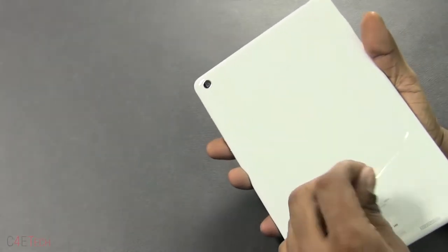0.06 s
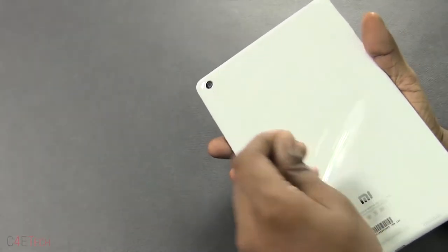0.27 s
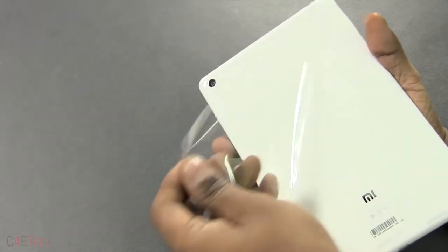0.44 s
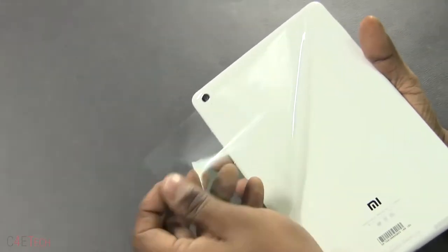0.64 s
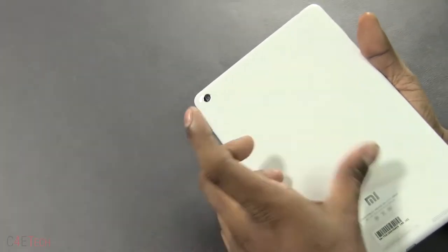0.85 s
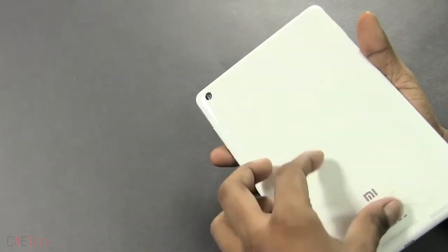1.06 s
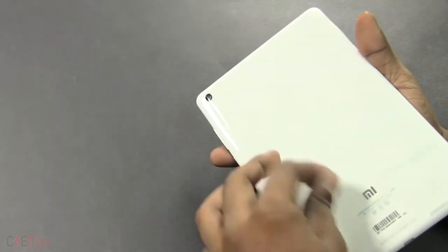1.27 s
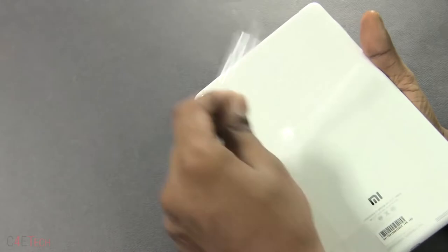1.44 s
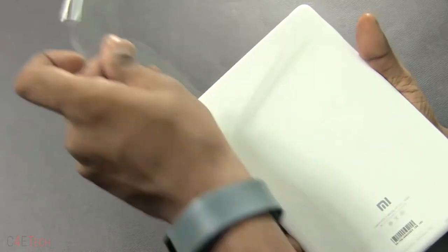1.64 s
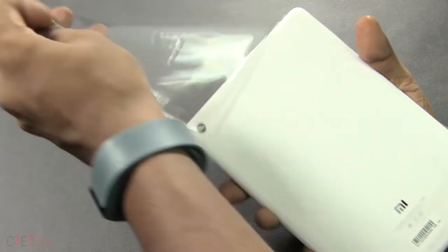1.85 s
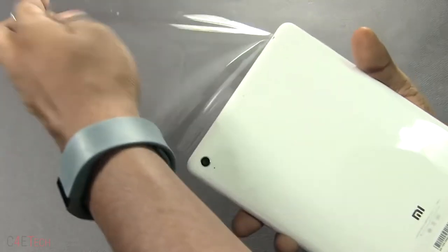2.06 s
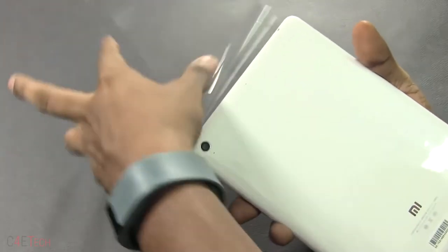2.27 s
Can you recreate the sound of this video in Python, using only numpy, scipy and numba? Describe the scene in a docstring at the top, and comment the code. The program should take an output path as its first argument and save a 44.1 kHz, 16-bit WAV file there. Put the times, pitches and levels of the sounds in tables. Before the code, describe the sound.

Crackly ripping of clear protective film from a hard case, two pulls with a sharp slap between

```python
"""Protective film is peeled off the back of a tablet in two pulls, close to the microphone in a bare room.
The glue parts by stick-slip: rapid slips, with fine crackle between them, ring three resonances of the taut sheet.
Lone snaps ring the same sheet, knocks ring the case, and creases in the loose film rustle as coloured clicks.
The released film slaps once, as a swing of air pressure. Decaying noise makes the echoes of the room, and slowly
decaying sine modes make a faint ring of metal; steady coloured noise lies beneath."""
import sys
import numpy as np
from scipy import signal
from scipy.fft import rfft, irfft
from scipy.io import wavfile
from scipy.ndimage import uniform_filter1d
from numba import njit

SR = 44100
rng = np.random.default_rng(int(sys.argv[2]) if len(sys.argv) > 2 else 0)


def log_audio(samples):
    """Write samples as a 16-bit WAV file to the path given in sys.argv[1]."""
    # one column per channel
    frames = np.atleast_2d(samples).T
    # limit to full scale, then quantise
    limited = np.clip(frames, -1, 1)
    pcm = np.round(limited * 32767).astype(np.int16)
    wavfile.write(sys.argv[1], SR, pcm)


N = 101429  # length in samples

# Steady background noise. Each row: frequency in Hz, relative level in dB.
FLOOR_COLOUR = [(30, -26.5), (130, 0.5), (550, 3.5), (1000, -7.5), (16000, -34)]
# Decay of the room. Each row: frequency in Hz, time to fall by 60 dB in seconds.
ROOM_T60 = [(150, .3), (600, 0.61), (2000, 0.5339), (4000, 0.72), (8000, 0.3537), (14000, 0.63)]
# Modes of the ringing metal. Each row: frequency in Hz, relative level in dB, time to fall by 60 dB in seconds.
METAL_MODES = [(2150, -6, 1), (3793, -7, 2.1), (3899, 0, 2.5), (3925, 2, .9)]
# Loose film rustling between the fingers. Each row: time in seconds, level in dB.
RUSTLE_LEVEL = [(0, -33.5), (.045, -44), (.1, -37), (.8, -41), (.93, -59.5), (1.06, -68.5), (1.11, -49),
                (1.2, -71.5), (1.34, -55), (1.39, -33), (2.06, -45), (2.19, -50.5), (2.3, -35.5)]
# Spectrum of the rustle. Each row: frequency in Hz, relative level in dB.
RUSTLE_COLOUR = [(100, -34.5), (500, -24.5), (950, 0.5), (1500, -4), (8000, -6), (16000, -15.5)]
# Resonances of the case. Each row: frequency in Hz, width in Hz, level in dB.
CASE_MODES = [(1040, 230, -3), (1820, 580, -3), (2746, 330, -14), (6300, 3800, -12.5)]
# Knocks on the case. Each row: time in seconds, level in dB.
KNOCKS = [(.0552, -5.5), (.7458, 4), (1.1264, -11), (2.149, -11), (2.213, -11.5), (2.2945, -6)]
# Single snaps of the film as a pull starts, as it breaks into jerks and as it is handled.
# Each row: time in seconds, crisp level in dB, flap level in dB.
SNAPS = [(.055, 2, -37.5), (.114, 2, -22), (.119, -0.5, -19), (.7458, -0.5, -12), (1.3525, -12.5, -50),
         (1.3715, -10.5, -13), (1.3795, -6, -36), (1.797, 5, -3), (1.8116, 7, -0.5), (1.8318, 0.5, -0.5),
         (1.842, 8.5, -8), (1.8468, -2, 1.5), (1.8712, 9, -3), (1.8844, 8.5, 0.5), (1.8936, 10, 0.5),
         (1.9092, -8, -6), (1.9136, 0.5, 2.5), (1.9214, 7.5, 0), (1.9503, -1, 4), (1.9603, 4, -8),
         (1.9681, 4, -2), (1.9821, 4.5, 4), (1.9918, 0, 0.5), (2.004, 4, 0.5), (2.2038, -16.5, -30),
         (2.254, -15, -35)]
# The sheet's resonances, which move with its tension and free length.
# Each row: time in seconds, crisp frequency in Hz, body frequency in Hz, flap frequency in Hz.
SHEET_HZ = [(.12, 7500, 2600, 1213), (.46, 8300, 2070, 760), (1.37, 6610, 2600, 1156),
            (1.5, 6400, 2330, 960), (1.6, 6870, 2300, 790), (1.7, 7940, 2940, 754), (1.95, 6800, 2920, 864)]
# The two pulls. Each row: time in seconds, slips per second, crisp, body and flap levels in dB.
FIRST_PULL = [(.122, 197.6, -23, -27, -39), (.16, 230, -17.5, -26, -30.5), (.2, 145, -24, -30, -39),
              (.255, 176, -22.5, -31.5, -36), (.34, 188, -20.5, -26, -32), (.39, 252, -18.5, -22.5, -29.5),
              (.464, 378, -16, -20, -24.5), (.51, 224, -20.5, -23, -28.5), (.57, 279, -17.5, -22.5, -25),
              (.615, 172, -39, -32.5, -42)]
SECOND_PULL = [(1.375, 500, -41, -45, -46), (1.405, 599, -29.5, -34.5, -33.5),
               (1.446, 503.4, -28.5, -29, -31), (1.453, 277.2, -19.5, -29, -30),
               (1.53, 261.3, -19, -27.5, -34), (1.59, 259.3, -20.5, -22.5, -31.5),
               (1.65, 231, -21.5, -23.5, -31.5), (1.76, 240.3, -20.5, -19, -32),
               (1.81, 299.5, -25.5, -23.5, -35.5), (1.925, 299.6, -24, -31, -30.5),
               (1.948, 298.4, -31, -53, -31.5), (2.045, 200.6, -49, -37, -38.5)]
# Response of the microphone. Each row: frequency in Hz, gain in dB.
MIC_RESPONSE = [(30, -36), (160, 4), (400, -1), (1400, -4.5), (1950, 0), (5000, -1), (9000, -1),
                (10800, -2), (16000, -3)]

FLOOR_DB, METAL_DB, TAIL_DB = -70.5, -60.5, -3.5
DESK_DB, DESK_DECAY_S = -2.5, 0.0027
WALL_DB, WALL_DELAY_S, WALL_DECAY_S = -2, .008, 0.0061
CASE_LOW_HZ = 750  # knocks are thinned below this
SLAP_S, SLAP_HZ, SLAP_DB = .746, 1265, -0.5
CRISP_WIDTH_HZ, BODY_WIDTH_HZ, FLAP_WIDTH_HZ = 3500, 1350, 555
BEND_MS = 0.593  # travel time of a 1 kHz bending wave across the film
SNAP_BODY_DB = -3.5
SLIP_JITTER, SLIP_SCATTER_DB, TIMBRE_SCATTER_DB = .38, 1, 1.5
CRACKLE_PER_S, CRACKLE_JITTER, CRACKLE_DB, CRACKLE_SCATTER_DB = 2200, 0.95, -9, 4
HUSH_DB, HUSH_FROM_HZ, HUSH_DEPTH_DB = -68, 650, -11
CEILING = .88  # amplitude that the rounded peaks approach
TOP_HZ = 15900


def undb(db):
    """Amplitude ratio: twenty decibels are a factor of ten."""
    return 10 ** (np.asarray(db) / 20)


def unit(x):
    """Normalisation to a root-mean-square of 1."""
    return x / np.sqrt(np.mean(x ** 2))


def curve(table, axis):
    """Linear interpolation of one column of a table over time."""
    rows = np.array(table)
    return np.interp(np.arange(N) / SR, rows[:, 0], rows[:, axis])


def at_pitch(points, hz):
    """Interpolation of (Hz, value) points on a logarithmic frequency axis."""
    rows = np.array(points)
    return np.interp(np.log(np.maximum(hz, 1)), np.log(rows[:, 0]), rows[:, 1])


def colour(x, points, size=4096):
    """Minimum-phase filtering: folding the cepstrum makes a (Hz, dB) response causal."""
    hz = np.arange(size // 2 + 1) * SR / size
    cepstrum = irfft(np.log(undb(at_pitch(points, hz))))
    cepstrum[1:size // 2] *= 2
    cepstrum[size // 2 + 1:] = 0
    impulse_response = irfft(np.exp(rfft(cepstrum)))
    return signal.fftconvolve(x, impulse_response)[:len(x)]


@njit
def moving_bandpass(x, g, k):
    """State-variable band-pass: two integrators in a loop, with tuning g and damping k at each sample."""
    y, band, low = np.empty(len(x)), 0., 0.
    for i in range(len(x)):
        v = (band + g[i] * (x[i] + 1e-18 - low)) / (1 + g[i] * (g[i] + k[i]))
        band = 2 * v - band
        low = low + 2 * g[i] * v
        y[i] = k[i] * v
    return y


def resonance(x, hz, width_hz):
    """Damped resonance, scaled so that a click keeps its energy."""
    g = np.tan(np.pi * hz / SR) * np.ones(N)
    k = width_hz / hz * np.ones(N)
    return moving_bandpass(x, g, k) * np.sqrt((1 + g * (g + k)) / (g * k))


def clicks(rate, jitter, scatter_db, count=7000):
    """Point process: log-normal gaps at a moving rate per second, with rms near 1."""
    gap, size = rng.standard_normal((count, 2)).T
    due = np.cumsum(np.exp(jitter * gap - jitter ** 2 / 2))
    elapsed = np.cumsum(rate * np.ones(N)) / SR  # clicks expected so far
    at = np.searchsorted(elapsed, due)
    heights = unit(undb(scatter_db * np.clip(size, -2, 2)))
    return np.bincount(at, heights, N + 1)[:N] * np.sqrt(SR / rate)


def blows(table, axis):
    """Impulsive excitation: one click a row, at the level in the given column."""
    rows = np.array(table)
    return np.bincount((rows[:, 0] * SR).astype(int), undb(rows[:, axis]), N)[:N]


def background():
    """Stationary noise with a fixed spectrum."""
    return undb(FLOOR_DB) * unit(colour(rng.standard_normal(N), FLOOR_COLOUR))


def metal(x):
    """Sympathetic resonance: close modes store the energy of the sound and ring on, beating."""
    t = np.arange(N) / SR
    out = 0
    for hz, db, t60 in METAL_MODES:
        energy_kept = np.exp(-2 * np.log(1000) / (t60 * SR))  # per sample
        stored = signal.lfilter([1], [1, -energy_kept], x ** 2)
        tone = np.sin(2 * np.pi * (hz * t + rng.random()))
        out = out + undb(METAL_DB + db) * np.sqrt(stored) * tone
    return out


def noise_burst(envelope):
    """Diffuse reflection: noise under a decay, brought to an expected energy of 1."""
    return rng.standard_normal(len(envelope)) * envelope / np.sqrt(np.sum(envelope ** 2))


def reflections(x, count=14, size=4096):
    """Early reflection from desk and walls, in a pattern that shifts as the hands move."""
    t = np.arange(size) / SR
    position = np.linspace(0, count - 1, N)
    out = 0
    for k in range(count):
        desk = noise_burst(np.exp(-t / DESK_DECAY_S) * (t > .0003))
        walls = noise_burst(np.exp(-t / WALL_DECAY_S) * (t > WALL_DELAY_S))
        echoes = undb(DESK_DB) * desk + undb(WALL_DB) * walls
        # neighbouring patterns crossfade at equal power
        here = np.sqrt(np.maximum(1 - np.abs(position - k), 0))
        out = out + signal.oaconvolve(x * here, echoes)[:N]
    return out


def reverberation(x):
    """Reverberant decay: overlapping bands of noise die away exponentially, each at its own rate."""
    t = np.arange(N) / SR
    noise, hz = rfft(rng.standard_normal(N)), np.arange(N // 2 + 1) * SR / N
    tail = 0
    for centre, t60 in ROOM_T60:
        band = at_pitch([(f, float(f == centre)) for f, _ in ROOM_T60], hz)
        decay = np.exp(-np.log(1000) * t / t60) * (t > WALL_DELAY_S)
        tail = tail + irfft(noise * band, N) * decay
    return signal.fftconvolve(x, undb(TAIL_DB) * tail / np.sqrt(np.sum(tail ** 2)))[:N]


def room(x):
    """Superposition of direct sound, early reflections, reverberation and sympathetic metal."""
    return x + reflections(x) + reverberation(x) + metal(x)


def rustle():
    """Crumpling: tiny creases in the loose film click at random with either sign."""
    grains = clicks(rate=1500, jitter=1.0, scatter_db=7.0) * rng.choice([-1, 1], N)
    return unit(colour(grains, RUSTLE_COLOUR)) * undb(curve(RUSTLE_LEVEL, axis=1))


def knocks():
    """Impact excitation: film and fingertips strike the case and ring its modes."""
    high_pass = signal.butter(3, CASE_LOW_HZ, "high", fs=SR, output="sos")
    hits = signal.sosfilt(high_pass, blows(KNOCKS, axis=1))
    return sum(undb(db) * resonance(hits, hz, width) for hz, width, db in CASE_MODES)


def slap():
    """Pressure pulse: the released film whips flat, one swing of air aimed at the microphone."""
    swing = 2 * np.pi * SLAP_HZ * (np.arange(N) / SR - SLAP_S)
    push = undb(SLAP_DB) * np.sin(swing) * np.exp(-(swing / np.pi) ** 2)
    return signal.sosfilt(signal.butter(2, SLAP_HZ / 2, "high", fs=SR, output="sos"), push)


def sheet(crisp, body, flap):
    """Resonance and dispersion: crisp edge, taut body and slack flap ring; bending waves bring treble out first."""
    edge_ring = resonance(crisp, curve(SHEET_HZ, axis=1), CRISP_WIDTH_HZ)
    body_ring = resonance(body, curve(SHEET_HZ, axis=2), BODY_WIDTH_HZ)
    flap_ring = resonance(flap, curve(SHEET_HZ, axis=3), FLAP_WIDTH_HZ)
    ringing = edge_ring - body_ring + flap_ring
    # delay falls as one over the root of frequency
    root_khz = np.sqrt(np.arange(N + 1) * SR / (2 * N) / 1000)
    dispersion = np.exp(-2j * np.pi * 2 * BEND_MS * root_khz)
    return irfft(rfft(ringing, 2 * N) * dispersion)[:N]


def snaps():
    """Sudden release: lone slips and buckles ring the sheet, the body's share drawn from edge and flap."""
    crisp, flap = blows(SNAPS, axis=1), blows(SNAPS, axis=2)
    body = undb(SNAP_BODY_DB) * np.cbrt(crisp ** 2 * flap)
    return sheet(crisp, body, flap)


def scattered(drive, db):
    """Random timbre: the level of a resonance's drive varies from slip to slip."""
    return drive * undb(db + TIMBRE_SCATTER_DB * rng.standard_normal(N))


def pull(table):
    """Stick-slip: jerks and the fine crackle of parting glue drive the sheet."""
    t = np.arange(N) / SR
    slips = clicks(curve(table, axis=1), SLIP_JITTER, SLIP_SCATTER_DB)
    crackle = clicks(CRACKLE_PER_S, CRACKLE_JITTER, CRACKLE_SCATTER_DB) * rng.choice([-1, 1], N)
    pulling = (t > table[0][0]) * (t < table[-1][0])
    drive = (slips + undb(CRACKLE_DB) * crackle) * pulling
    crisp = scattered(drive, curve(table, axis=2))
    body = scattered(drive, curve(table, axis=3))
    flap = scattered(drive, curve(table, axis=4))
    return sheet(crisp, body, flap)


def scene():
    """Superposition of the pulls, the handling and the background, alike in both channels."""
    peel = pull(FIRST_PULL) + pull(SECOND_PULL)
    handling = snaps() + knocks() + rustle()
    heard = room(peel + handling) + slap() + background()
    return np.array([heard, heard])


def suppress(x, size=512):
    """Spectral noise suppression: above the bass, bands near or under a power threshold are turned down."""
    hz, _, bins = signal.stft(x, SR, nperseg=size)
    power = uniform_filter1d(np.abs(bins) ** 2, size=5, axis=0)  # smoothed over frequency
    power = uniform_filter1d(power, size=3, axis=1)  # and over time
    threshold = undb(HUSH_DB) ** 2 * (hz[:, None] > HUSH_FROM_HZ)
    gain = 1 - threshold / (np.abs(power) + threshold + 1e-18)
    gain = np.maximum(gain, undb(HUSH_DEPTH_DB))
    return signal.istft(bins * gain, SR, nperseg=size)[1][:N]


def record(dry):
    """Transduction: the recorder thins the bass, hushes faint noise, rounds the peaks and cuts the top."""
    # the microphone inverts the polarity
    x = np.array([suppress(colour(-channel, MIC_RESPONSE)) for channel in dry])
    x = x / (1 + (x / CEILING) ** 4) ** .25
    low_pass = signal.ellip(10, .2, 80, TOP_HZ, fs=SR, output="sos")
    return signal.sosfilt(low_pass, x)


dry = scene()
out = record(dry)
log_audio(out)
```